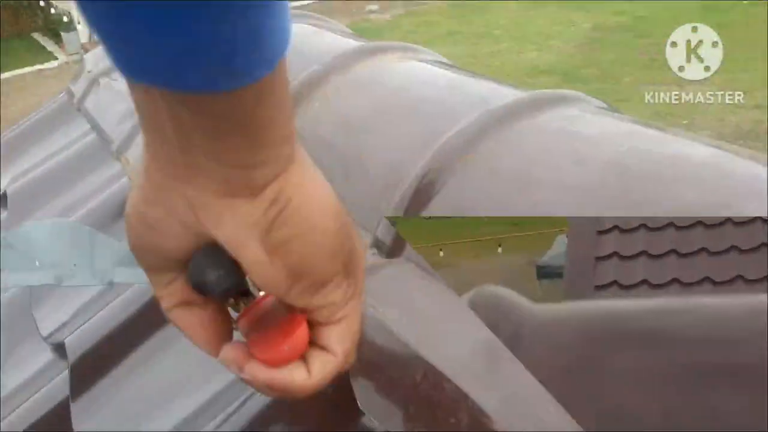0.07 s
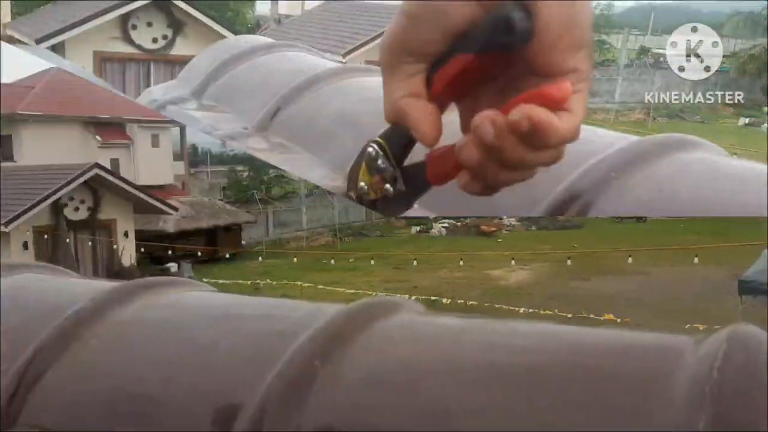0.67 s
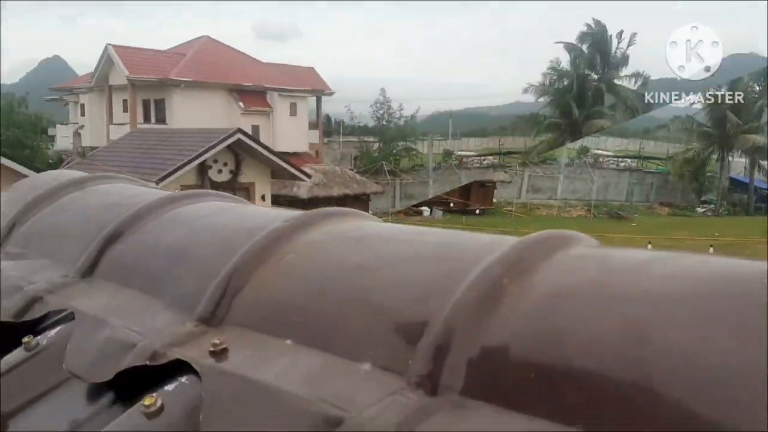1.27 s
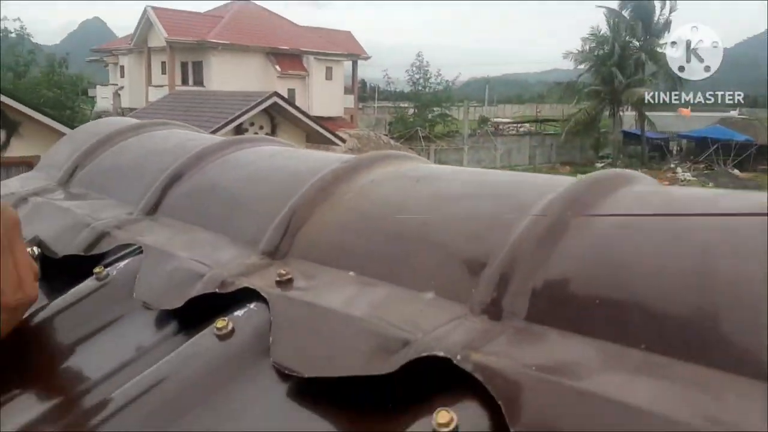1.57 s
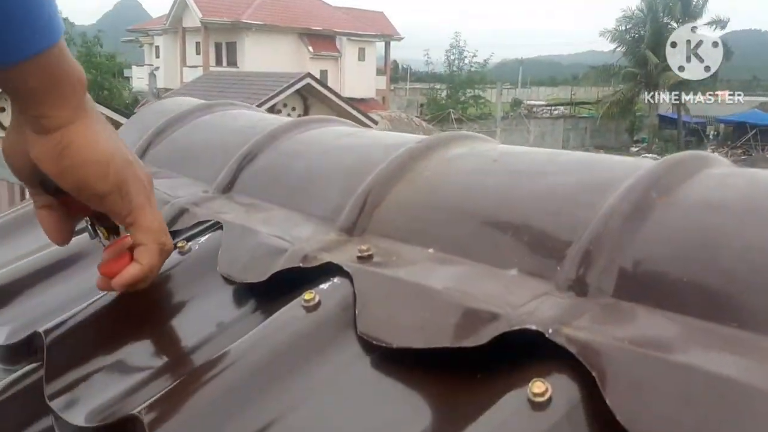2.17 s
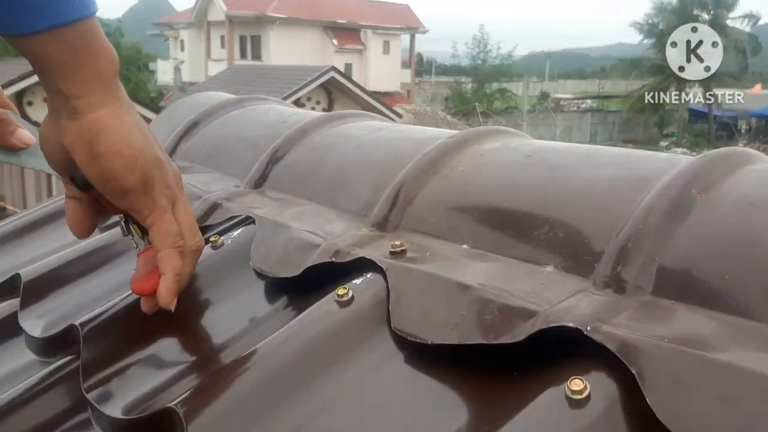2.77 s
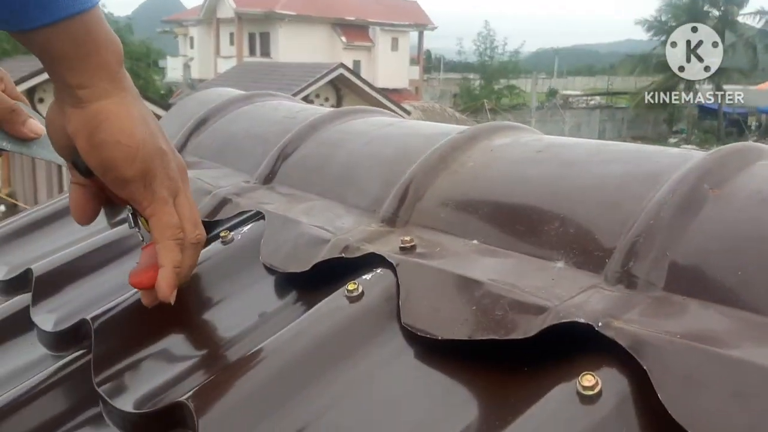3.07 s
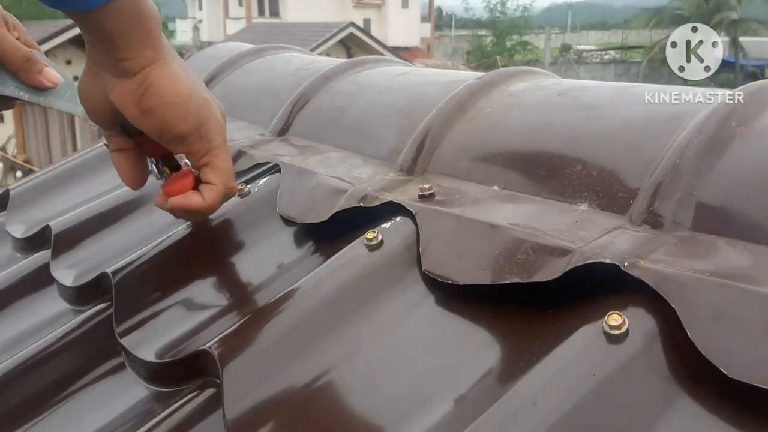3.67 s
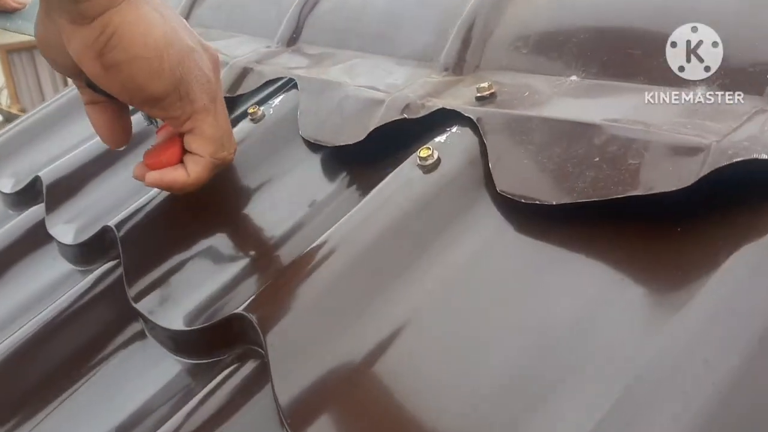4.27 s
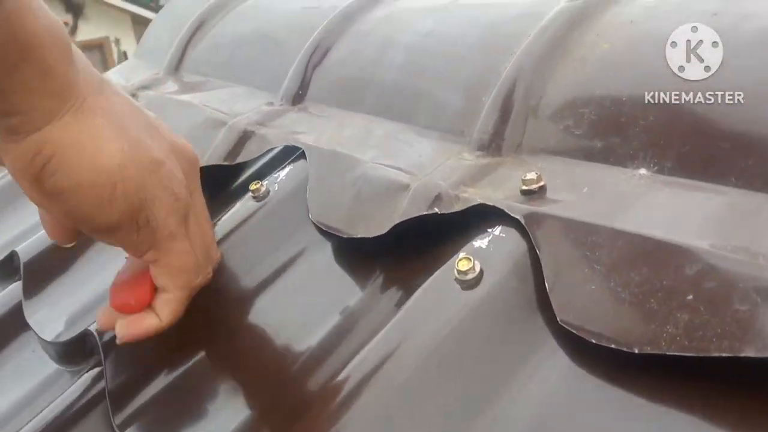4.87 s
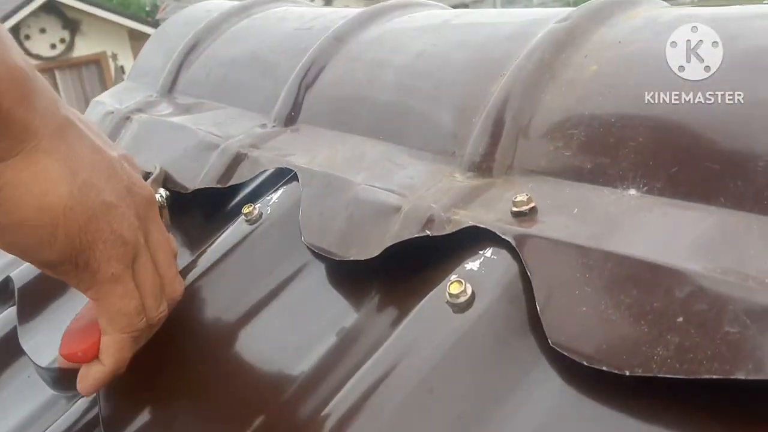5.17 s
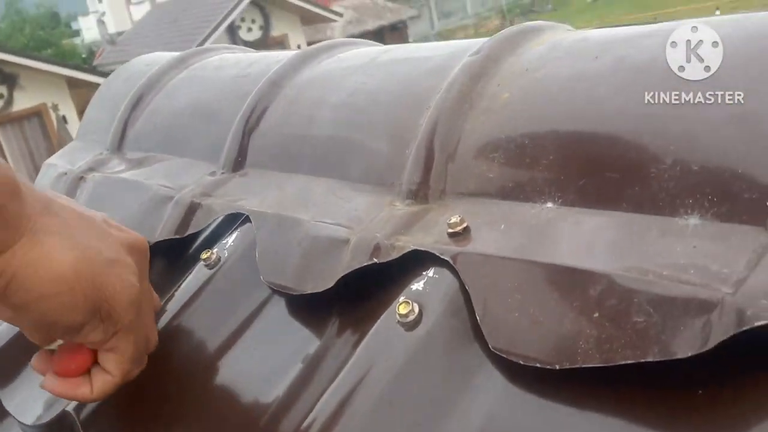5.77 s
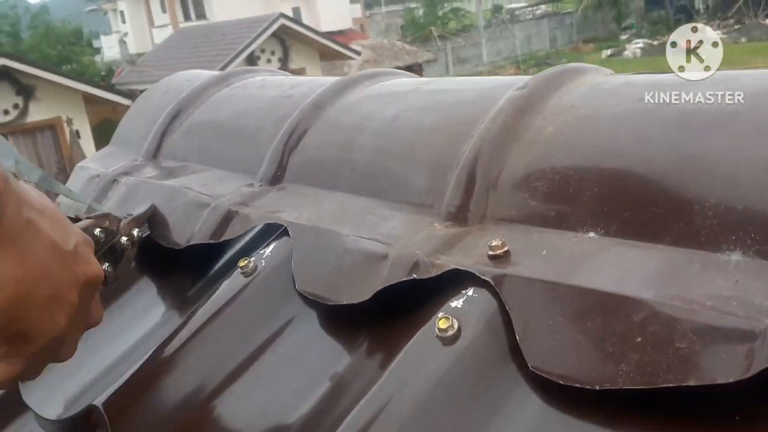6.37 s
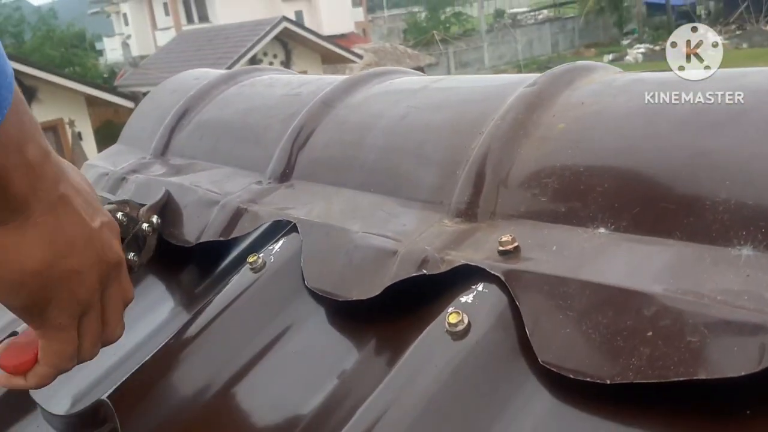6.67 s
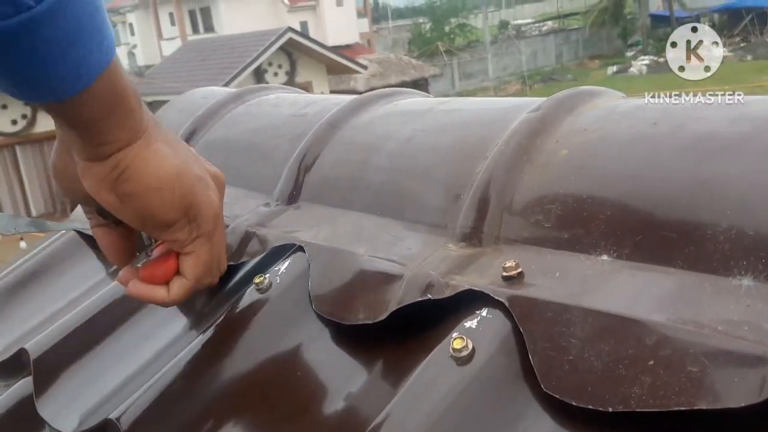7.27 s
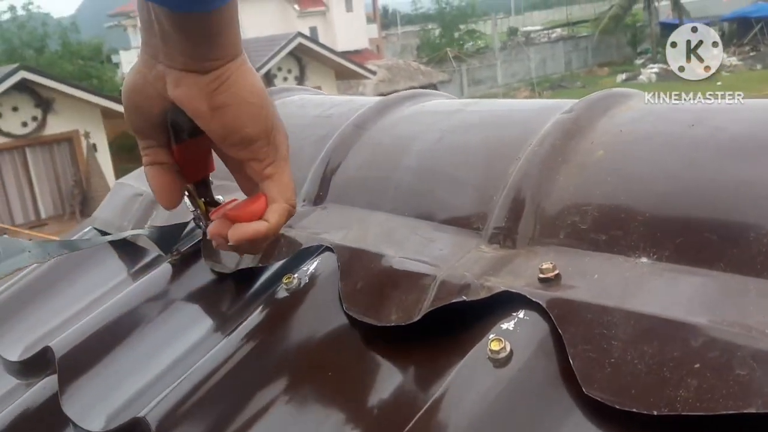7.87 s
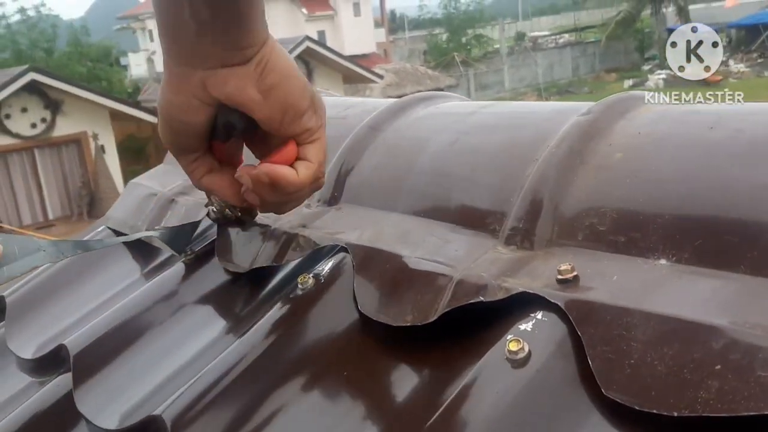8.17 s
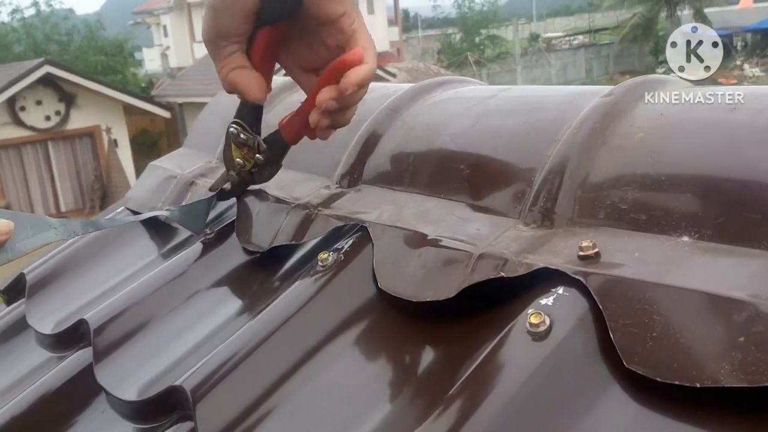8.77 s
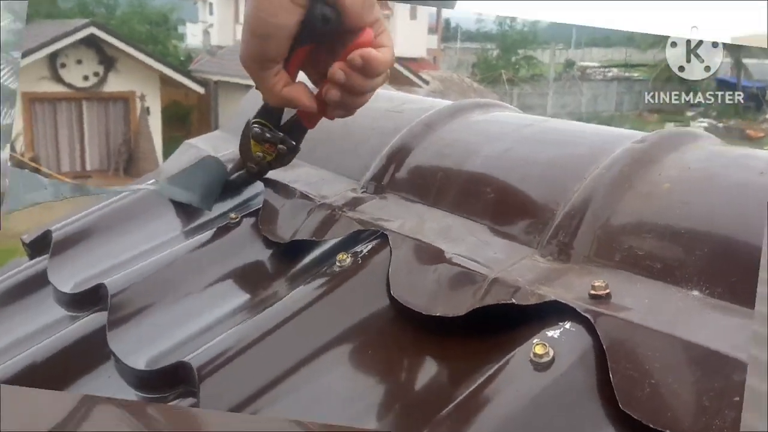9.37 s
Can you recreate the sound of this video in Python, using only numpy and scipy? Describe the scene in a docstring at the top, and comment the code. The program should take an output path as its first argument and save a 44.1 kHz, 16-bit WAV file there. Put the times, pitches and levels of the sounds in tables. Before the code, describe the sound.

Wind buffets the microphone over a faint distant wash while someone handles snips on a metal roof, with soft rattles, rustles and rubbing. After a few seconds the snips bite into the steel sheet close by, again and again at an uneven pace, each squeeze a dense crackle, several finishing with a crisp ringing snap. Tiny squeaks and one hollow pop of the sheet come among the last cuts.

```python
"""Outdoors on a roof, hand snips cut through a pressed-steel sheet about a metre from a phone.
Each squeeze shears the steel in a dense crackle, and some bites end in a snap; both ring the sheet.
The jaws squeak, the sheet buckles once, and early on something rubs, rustles and rattles lightly.
Wind buffets the two microphone ports, over a distant wash, a wavering drone and a faint high whistle."""
import sys
import numpy as np
from scipy import signal
from scipy.fft import rfft, irfft
from scipy.io import wavfile

SR = 44100
rng = np.random.default_rng(int(sys.argv[2]) if len(sys.argv) > 2 else 0)


def materialize(psi):
    """Save the field psi as 16-bit PCM at rate SR to the path in sys.argv[1].

    A 1-D psi becomes a single channel; in a 2-D psi each row is a channel.
    """
    bounded = np.clip(np.atleast_2d(psi).T, -1, 1)
    quanta = np.round(bounded * 32767).astype(np.int16)
    wavfile.write(sys.argv[1], SR, quanta)


N = 419391
TIME = np.arange(N) / SR
SIDES = np.array([[1], [-1]])  # left, right

# strength of the wind at the ports: (time [s], rumble [dB], buffeting [dB])
WIND_STRENGTH = [(0, -53.5, -42), (.64, -47.5, -46.5), (0.85, -42.5, -37), (1.2, -40.5, -43.5),
                 (1.36, -32.5, -42), (2.0, -35.5, -39), (2.2, -45, -58), (2.42, -63, -57.5),
                 (2.74, -43, -54), (3.55, -37, -44.5), (4.352, -38.5, -43), (4.8, -37.5, -40),
                 (5.05, -33.5, -38), (5.5, -39, -42.5), (5.76, -32.5, -43), (5.9, -47, -51),
                 (6.12, -36.5, -47), (6.82, -39.5, -44.5), (7.1, -34, -38.5), (7.55, -36, -43),
                 (9.51, -37.5, -42.5)]
# tone of air crackling in a port: (frequency [Hz], level [dB])
PORT_SPECTRUM = [(200, -19), (550, -14.5), (800, 7), (1200, -13.5), (2000, -15.5), (8000, -50)]
# tone of a dry crackle: (frequency [Hz], level [dB])
CRACKLE_SPECTRUM = [(1000, -4.5), (3800, -8), (7500, -11.5), (15500, -23)]


def snips(grit_db=-11, crack=0.23, edge_db=-17, snap_rise_s=0.00084):
    """Strokes swell as the hand squeezes; snaps start at once with a crack. Both drive the sheet."""
    # the blades shear or scrape the steel: (start [s], swell [s], fade [s], level [dB], body [dB])
    strokes = [(-0.028, 0.043, 0.086, -34, -3), (0.815, 0.077, 0.028, -30, 2.5), (.98, 0.016, 0.2, -41, 2),
               (3.091, 0.052, 0.18, -43, -1), (3.55, 0.063, 0.025, -29.5, -2),
               (3.832, 0.087, 0.04, -29, -1), (4.143, 0.068, 0.031, -27.5, -6.5),
               (4.424, 0.031, 0.024, -23, 0), (4.625, 0.05, 0.0026, -23.5, 3.5),
               (4.753, 0.057, 0.02, -29.5, 2.5), (4.923, 0.04, 0.021, -22.5, 3.5),
               (5.64, 0.08, 0.034, -29, -2), (5.845, 0.084, 0.015, -29, 0.5),
               (6.006, 0.067, 0.037, -30, -2), (6.227, 0.066, 0.028, -26, 3),
               (6.393, 0.033, 0.038, -21, -8), (6.572, 0.075, 0.011, -28, 1),
               (6.755, 0.089, 0.013, -26, -5.5), (6.956, 0.053, 0.03, -23.5, 0),
               (7.327, 0.052, 0.051, -34, 1), (8.171, 0.048, 0.034, -31.5, -1.5),
               (8.352, 0.13, 0.079, -33, -10), (8.59, 0.069, 0.1, -29.5, 4.5),
               (8.81, 0.046, 0.027, -25, 3.5), (8.974, 0.033, 0.042, -26, -2.5),
               (9.135, 0.11, 0.024, -26, 4), (9.304, 0.04, 0.072, -27.5, -3.5)]
    # the blades break through: (time [s], fade [s], level [dB], body [dB], treble [dB], edge note [Hz])
    snaps = [(3.594, 0.015, -9, -6.5, 3, 3330), (3.903, 0.0059, -11.5, 3, -1.5, 2310),
             (4.218, 0.015, -12, -7, 8.5, 2330), (4.498, 0.015, -20.5, -8.5, 4, 2400),
             (4.647, 0.026, -17.5, -19, 2.5, 2125), (5.446, 0.021, -31, 3, -10, 2316),
             (6.469, 0.0069, -15, -4.5, -11, 4030), (6.903, 0.0077, -8.5, -17.5, 6, 2180),
             (7.147, 0.025, -20.5, -4, 3, 2240), (7.188, 0.014, -5.5, -13.5, 2.5, 4050),
             (7.222, 0.0052, -6.5, -7.5, 7.5, 4060), (8.47, 0.0047, -18.5, 3, -0.5, 4610),
             (9.09, 0.014, -23.5, -1, -2.5, 3470), (9.332, 0.022, -21, -5.5, 2, 3420)]
    out = np.zeros((2, N))
    for start, swell, fade, db, body_db in strokes:
        t = seconds(min(swell + 5 * fade, 2))
        squeeze = swell_fade(t, swell, fade)
        force = tearing(t, slips_per_s=800, spread_db=3.75) * surges(t) * squeeze
        response = sheet(body_db, treble_db=-3)  # slow shearing sounds dull
        add(out, start, undb(db) * signal.fftconvolve(force[None], response))
        add(out, start, undb(db + grit_db) * grit(t) * squeeze)
    for start, fade, db, body_db, treble_db, note_hz in snaps:
        t = seconds(5 * fade)
        force = tearing(t, slips_per_s=4000, spread_db=1) * swell_fade(t, snap_rise_s, fade)
        force[0] += crack * np.linalg.norm(force)
        response = sheet(body_db, treble_db, extra_peaks=[(note_hz, 160, 4)])
        response += undb(edge_db) * cut_edge(note_hz, TIME[:response.shape[1]])
        add(out, start, undb(db) * signal.fftconvolve(force[None], response))
    return out


def tearing(t, slips_per_s, spread_db):
    """Steel gives way in tiny slips of unequal size: random impulses, at least one; rms 1."""
    chance, size, sign = rng.random((3, 3 * SR))[:, :len(t)]
    slips = chance <= max(slips_per_s / SR, chance.min())
    strength = undb(-spread_db * np.log(np.maximum(size, 0.03)))
    return unit(slips * strength * np.sign(sign - 0.5))


def surges(t, spread_db=5.5, every_s=0.00674):
    """The blades catch and let go, so a stroke advances unevenly; the hand's force has a ceiling."""
    pushes = np.minimum(rng.standard_normal(512), 0.5)
    return unit(undb(spread_db * np.interp(t / every_s, np.arange(512), pushes)))


def grit(t, grain_s=0.0008):
    """The coarser slips reach the ear straight from the jaws as dry crackles; rms 1."""
    grain = noise(CRACKLE_SPECTRUM, len(t), likeness=0.38) * np.exp(-t / grain_s)
    slips = tearing(t, slips_per_s=160, spread_db=2.2)
    return unit(irfft(rfft(grain) * rfft(slips), len(t)))


def sheet(body_db, treble_db, extra_peaks=(), crack_db=-1, tail_db=0.5, rings_db=-12, lag_s=0.00045):
    """The sheet's answer to a knock: a crack near the jaws, a wash of crowded modes, a few lone rings."""
    # overall tone of the crowded modes: (frequency [Hz], level [dB])
    spectrum = [(100, -26), (300, 3), (560, -6), (760, 6.5), (1300, 3.5), (1800, -7.5), (2400, -4),
                (3800, -5), (4900, -10), (7800, -13), (8700, -26), (10500, -16), (15500, -22)]
    # where they bunch up: (centre [Hz], width [Hz], boost [dB])
    clusters = [(840, 90, 2.3), (1134, 26, 4.3), (1212, 35, 5.6), (1550, 137, 8.7), (2070, 105, 12.7),
                (2580, 38, 2), (2580, 30, 1.9), (2700, 53, 6), (3370, 280, 2.5), (3896, 38, 3.7),
                (4065, 80, 5.4), (7860, 670, 5.6)]
    # how long they last: (frequency [Hz], t60 [s])
    decays = [(500, 0.31), (1200, 0.24), (3000, 0.26), (8000, 0.23), (14000, 0.22)]
    # lone modes that ring on: (frequency [Hz], level [dB], t60 [s])
    lone_modes = [(1106, 5.5, 0.078), (1188, -2.5, 0.43), (2170, 2, 0.27), (2330, -1, 0.47),
                  (2560, -9.5, 0.61), (3370, -11.5, 0.5), (3740, -5.5, .39), (4760, -20, 0.26),
                  (7250, -16, .3)]
    size = 24000
    t, hz = np.arange(size) / SR, bins(size)
    flat = [(1, 0), (SR, 0)]
    fading = lambda t60: unit(np.exp(-np.log(1000) * t / t60)) / np.sqrt(size)
    wash = rfft(noise(flat, size))
    centres, t60s = np.transpose(decays)
    bands = [along(np.c_[centres, band], hz) for band in np.eye(len(centres))]
    tail = sum(irfft(wash * band) * fading(t60) for band, t60 in zip(bands, t60s))
    crack = noise(flat, size, likeness=0.36) * fading(t60=0.049)
    crowded = undb(crack_db) * crack + undb(tail_db) * tail
    peaks_db = sum(db / (1 + (2 * (hz - f) / width) ** 2) for f, width, db in [*clusters, *extra_peaks])
    colour = unit(undb(along(spectrum, hz) + peaks_db))
    steel = rfft(crowded) * colour + undb(rings_db) * rfft(ring(lone_modes, t))
    # a slow bite bends the whole sheet, which lies to the right; a quick one excites the treble
    body_cut_db = min(body_db, 0)
    bite = undb(along([(800, body_cut_db), (1210, body_db), (1500, body_cut_db), (2000, 0), (3400, 0),
                       (5500, treble_db), (8000, treble_db), (11000, treble_db / 2)], hz))
    pan = undb(SIDES / 2 * along([(1300, -2), (2500, -0.5), (9000, -0.24)], hz))
    left_delay = np.exp(-2j * np.pi * hz * lag_s * (SIDES > 0))
    return irfft(steel * bite * pan * left_delay)[:, :20000]


def cut_edge(note_hz, t, count=12, scatter=0.07, t60_s=0.5):
    """The freshly cut edge sings on in close modes that beat against each other."""
    pitch, size = rng.standard_normal((2, count))
    return ring(np.c_[note_hz * np.exp(scatter * pitch), 2 * size, np.full(count, t60_s)], t)


def ring(modes, t, detune=0.00228):
    """Damped modes; random sizes and phases stand for where the steel is struck and heard."""
    hz, db, t60 = np.transpose(modes)[:, :, None]
    hz = hz * (1 + detune * rng.standard_normal(hz.shape))
    waves = np.exp((2j * np.pi * hz - np.log(1000) / t60) * t)
    weights = rng.standard_normal((2, len(hz))) + 1j * rng.standard_normal((2, len(hz)))
    return unit(((weights * undb(db.T)) @ waves).imag) / np.sqrt(len(t))


def buckle(pan_db=-2, lag_s=0.000072, wash_db=11, clack_db=7):
    """A panel pops through with a hollow clack, which spreads into the rest of the sheet."""
    # the quick pops of one buckle: (time [s], relative level [dB])
    pops = [(8.6743, -13.5), (8.6795, -17), (8.686, -23)]
    # the panel's short modes: (frequency [Hz], level [dB], t60 [s])
    modes = [(750, 2, 0.097), (1100, 6, 0.22), (1152, 21, 0.077), (1566, 12, 0.066), (2250, 0, 0.087)]
    out, t = np.zeros((2, N)), seconds(0.25)
    clack = sum(undb(db) * np.sin(2 * np.pi * hz * t) * np.exp(-np.log(1000) * t / t60)
                for hz, db, t60 in modes)
    clack /= np.max(np.abs(clack))
    pair = np.array([clack, np.interp(t - lag_s, t, clack)]) * undb(SIDES * pan_db / 2)
    for start, db in pops:
        add(out, start, undb(db + clack_db) * pair)
        add(out, start, undb(db + wash_db) * sheet(body_db=13, treble_db=-18))
    return out


def squeaks(rise_s=0.00155):
    """The jaws catch for a few milliseconds on a narrow resonance."""
    # each catch: (time [s], pitch [Hz], level [dB])
    catches = [(0.735, 3850, -31), (8.402, 3980, -35.5), (8.437, 3600, -34), (8.500, 4560, -31),
               (8.56, 4150, -30), (8.59, 4000, -35)]
    out, t = np.zeros((2, N)), seconds(0.05)
    envelope = t / rise_s * np.exp(1 - t / rise_s)
    for s, hz, db in catches:
        tone = noise([(hz * 0.93, -40), (hz, 0), (hz * 1.3, -40)], len(t), likeness=0.12)
        add(out, s - rise_s / 2, undb(db) * tone * envelope)
    return out


def rattle(run_db=-3, rise_s=0.0045, fade_s=0.014, click_fade_s=0.0026):
    """Runs of short bright chatters, and a few sharper single clicks."""
    # evenly paced light rattling: (start [s], length [s], gap [s], first level [dB], last level [dB])
    runs = [(0.056, .46, .0612, -30, -33), (0.398, .05, .0205, -31, -30), (0.573, .19, .0545, -34, -29),
            (0.952, .33, .0615, -37, -39)]
    # dry clicks of the tool: (time [s], level [dB])
    clicks = [(0.018, -24.5), (0.068, -25), (0.371, -28), (0.416, -25.5), (0.689, -42), (0.733, -29),
              (1.137, -31)]
    out, t = np.zeros((2, N)), seconds(0.1)
    for start, length, gap, first_db, last_db in runs:
        times = start + np.arange(0, length, gap)
        for s, db in zip(times, np.linspace(first_db, last_db, len(times))):
            add(out, s - rise_s / 2, undb(db + run_db) * chatter(t) * swell_fade(t, rise_s, fade_s))
    for s, db in clicks:
        add(out, s, undb(db) * chatter(t) * np.exp(-t / click_fade_s))
    return out


def chatter(t, tick_s=0.00019, hiss_db=-6):
    """A cluster of tiny dry ticks in a bright hiss; rms 1."""
    # tone of ticks and hiss: (frequency [Hz], level [dB])
    spectrum = [(1800, -26), (2750, -10), (3500, 8), (4400, 8), (5400, -3.5), (8500, -3), (15500, -5.5)]
    tick = noise(spectrum, len(t), likeness=0.22) * np.exp(-t / tick_s)
    ticks = irfft(rfft(tick) * rfft(tearing(t, slips_per_s=1800, spread_db=2.1)))
    return unit(unit(ticks) + undb(hiss_db) * noise(spectrum, len(t)))


def rub(grain_db=4.5, grain_hz=60):
    """Something slides over the paint with a dull, uneven rub that does not ring the sheet."""
    # each slide: (start [s], swell [s], fade [s], level [dB])
    slides = [(-0.05, .05, 0.12, -42), (.88, 0.31, 0.53, -42.5), (1.17, 0.055, 0.26, -33),
              (3.05, 0.21, 0.22, -32.5), (3.5, 0.27, 0.19, -35.5)]
    # tone of the friction: (frequency [Hz], level [dB])
    spectrum = [(200, -4.5), (550, -0.5), (900, 6.5), (1500, -4), (2200, -13.5), (4500, -21), (8500, -27.5),
                (15000, -25.5)]
    power = sum((undb(db) * swell_fade(np.maximum(TIME - start, 0), swell, fade)) ** 2
                for start, swell, fade, db in slides)
    friction = noise(spectrum, N, likeness=0.29) * undb(grain_db * flutter(grain_hz))
    return unit(friction) * np.sqrt(power)


def rustle(grain_s=0.003):
    """A bright, dry rustle of many small crackles."""
    # each flurry: (start [s], swell [s], fade [s], level [dB])
    flurries = [(0, 0.009, 0.024, -30.5), (1.0, 0.046, .06, -41), (1.22, 0.212, .035, -41)]
    out, t = np.zeros((2, N)), seconds(0.5)
    colour = undb(along(CRACKLE_SPECTRUM, bins(len(t))))
    for start, swell, fade, db in flurries:
        grain = rng.standard_normal((2, len(t))) * np.exp(-t / grain_s)
        crackle = irfft(rfft(grain) * rfft(tearing(t, slips_per_s=900, spread_db=1)) * colour)
        add(out, start, undb(db) * unit(crackle) * swell_fade(t, swell, fade))
    return out


def wind(rumble_db=1, buffet_db=-0.5, crackle_db=-10, rumble_pan_db=6):
    """Turbulence, different at each port: a rumble, fitful buffeting and a dull crackle at its peaks."""
    # tone of the rumble: (frequency [Hz], level [dB])
    rumble_spectrum = [(20, -26), (60, -2.5), (100, -1), (180, -3.5), (260, -9), (500, -53), (1500, -48)]
    # tone of the buffeting: (frequency [Hz], level [dB])
    buffet_spectrum = [(100, -18), (220, -2), (330, 4), (500, -2), (800, -7.5), (1300, -22), (2500, -35),
                       (8000, -62)]
    times, *levels = np.transpose(WIND_STRENGTH)
    low_db, high_db = (np.interp(TIME, times, level) for level in levels)
    fits = flutter(27.4)  # all three layers surge with this
    rumble = noise(rumble_spectrum, N, likeness=0.08)
    rumble *= undb(5.5 * np.minimum(unit(flutter(13.3) + fits / 2), 1.4))
    buffet = noise(buffet_spectrum, N) * undb(8.5 * np.minimum(fits, 1))
    crackle = noise(PORT_SPECTRUM, N) * undb(24 * np.minimum(unit(fits + flutter(87)), 2))
    return (unit(rumble) * undb(low_db + rumble_db + SIDES * rumble_pan_db / 2)
            + unit(buffet) * undb(high_db + buffet_db)
            + unit(crackle) * undb(high_db + crackle_db))


def gusts():
    """Each strong gust hits the ports with a single thump."""
    # (peak time [s], swell [s], level [dB], centre [Hz], left minus right [dB])
    thumps = [(0.018, 0.0035, -27, 500, -11), (0.774, 0.0098, -24, 150, -4), (1.321, 0.005, -19.5, 266, -2),
              (1.407, 0.0066, -20.5, 332, -1.5), (1.521, 0.0036, -27, 497, -8),
              (1.545, 0.0047, -26.5, 383, 2), (1.577, 0.0028, -26, 330, -12),
              (1.621, 0.0026, -27.5, 660, -12), (1.665, 0.0046, -28, 680, -10),
              (1.758, 0.0047, -24.5, 380, -10), (1.781, 0.0085, -26, 282, -1),
              (1.828, 0.0047, -31.5, 596, -10), (1.909, 0.0053, -29.5, 514, 0),
              (1.932, 0.0057, -28.5, 283, -2), (2.064, 0.0075, -26, 213, -4),
              (3.045, 0.0089, -27.5, 194, -4), (4.011, 0.019, -28.5, 219, -3),
              (5.089, 0.0049, -26, 210, -1), (5.109, 0.0046, -22, 230, 1), (5.156, 0.0052, -24, 230, -3),
              (5.188, .003, -32, 300, 0), (5.334, 0.0035, -25.5, 330, -9), (5.666, 0.0054, -21, 240, -3),
              (5.712, 0.011, -25.5, 302, -3), (5.781, 0.0086, -26, 190, 0),
              (6.484, 0.013, -19.5, 232, -1.5), (7.016, .016, -21, 240, -2.5), (7.065, 0.0092, -24, 201, 1),
              (7.436, 0.0087, -28.5, 372, -18), (7.648, 0.0074, -27, 480, -2),
              (7.733, 0.00152, -21, 240, 2), (7.757, 0.0034, -24.5, 388, 0),
              (7.944, 0.0076, -29.5, 273, -2), (8.116, 0.014, -26, 268, 2), (8.282, 0.0046, -26, 148, -5)]
    out = np.zeros((2, N))
    for peak, swell_s, db, hz, pan_db in thumps:
        add(out, peak - swell_s, undb(db) * puff(swell_s, hz, pan_db))
    return out


def eddies(count=130, gain_db=5.5, centre_hz=480, spread_octaves=0.4, swell_cycles=0.82):
    """Small eddies knock at random, harder as the wind buffets more; the higher ones are shorter."""
    out = np.zeros((2, N))
    times, _, buffeting_db = np.transpose(WIND_STRENGTH)
    starts = rng.random(count) * N / SR
    for start, (softer_db, pitch, side) in zip(starts, rng.standard_normal((count, 3))):
        hz = centre_hz * 2 ** (spread_octaves * pitch)
        db = np.interp(start, times, buffeting_db) + gain_db - softer_db
        add(out, start, undb(db) * puff(swell_cycles / hz, hz, pan_db=-3 + 7 * side))
    return out


def puff(swell_s, hz, pan_db, crack_s=0.0028):
    """A dull puff of air that breaks at its height with a crack in the port; higher puffs crack harder."""
    t = seconds(0.1)
    swell = t / swell_s * np.exp(1 - t / swell_s)
    spectrum = [(hz / 10, -26), (hz / 2, -5), (hz, 0), (hz * 2, -12), (hz * 4, -25), (hz * 16, -54)]
    air = swell * noise(spectrum, len(t))
    air *= np.linalg.norm(swell) / np.linalg.norm(air, axis=1, keepdims=True)
    crack = np.exp(-np.abs(t - swell_s) / crack_s) * noise(PORT_SPECTRUM, len(t), likeness=0.2)
    crack_db = -3 + 5 * np.log2(hz / 400)
    return (air + undb(crack_db) * crack) * unit(undb(SIDES * pan_db / 2))


def outdoors(wash_db=-48.5, waver_db=0.86, drone_hz=1570, drone_flutter_db=6):
    """A faint, nearly even wash from far away, and a narrow, noisy drone that comes and goes in it."""
    # tone of the far surroundings: (frequency [Hz], level [dB])
    spectrum = [(150, -6), (300, -24), (600, -7.5), (900, -0.5), (1280, -7), (1720, -3), (2300, -7.5),
                (5000, -11), (8000, -15), (9000, -18), (15500, -16)]
    # rise and fall of the drone: (time [s], level [dB])
    drone_levels = [(0, -76), (.8, -64), (1.2, -53), (2.3, -57.5), (3.2, -55), (5, -60.5), (9.51, -57)]
    drone = noise([(drone_hz * 0.51, -35), (drone_hz, 0), (drone_hz * 1.23, -28), (drone_hz * 2, -55)], N)
    drone *= undb(np.interp(TIME, *np.transpose(drone_levels)) + drone_flutter_db * flutter(36))
    wash = noise(spectrum, N, likeness=0.031) * undb(wash_db + waver_db * flutter(19))
    return wash + drone


def whistle(waver=0.006, flutter_db=5):
    """A very high, unsteady thread of tone glides down, up and down."""
    # its path: (time [s], pitch [Hz], relative level [dB])
    glide = [(1.201, 14700, -69), (1.7, 12200, -53), (2.1, 11000, -66), (3.2, 7150, -81), (3.8, 13400, -63),
             (4.4, 11300, -53)]
    times, hz, db = np.transpose(glide)
    pitch = np.interp(TIME, times, hz) * (1 + waver * flutter(39.2))
    phase = 2 * np.pi * np.cumsum(pitch, axis=1) / SR
    level_db = np.interp(TIME, times, db, left=-np.inf, right=-np.inf)
    return np.sin(phase) * undb(level_db + flutter_db * (flutter(18) - 0.5))


def noise(points, size, likeness=0):
    """Stereo noise shaped by (frequency [Hz], level [dB]); likeness is the power share in common."""
    white = rng.standard_normal((3, size))
    pair = np.sqrt(likeness) * white[2] + np.sqrt(1 - likeness) * white[:2]
    return unit(irfft(rfft(pair) * undb(along(points, bins(size))), size))


def flutter(rate_hz):
    """Smooth random motion, separate for each channel; rms 1."""
    return unit(irfft(rfft(rng.standard_normal((2, N))) / (1 + (bins(N) / rate_hz) ** 4), N))


def swell_fade(t, swell, fade):
    """Pressure builds evenly, then dies away."""
    return np.minimum(t / swell, np.exp(-np.maximum(t - swell, 0) / fade))


def add(out, s, x):
    """Mix a sound in at time s."""
    start = int(s * SR)
    first, last = max(start, 0), min(start + x.shape[-1], N)
    out[:, first:last] += x[..., first - start:last - start]


def along(points, hz):
    """Read (frequency [Hz], value) points on a log-frequency axis."""
    f, value = np.transpose(points)
    return np.interp(np.log(hz), np.log(f), value)


def bins(size):
    """Frequencies of a spectrum, floored at 1 Hz."""
    return np.maximum(np.fft.rfftfreq(size, 1 / SR), 1)


def seconds(length):
    """Time axis of a short sound."""
    return np.arange(int(length * SR)) / SR


def undb(db):
    """Decibels to gain."""
    return 10 ** (np.asarray(db) / 20)


def unit(x):
    """Scale to rms 1."""
    return x / np.sqrt(np.mean(x ** 2))


def scene():
    """Work on the roof up front, wind on the ports, the distance behind."""
    work = snips() + buckle() + squeaks() + rattle() + rub() + rustle()
    return work + wind() + gusts() + eddies() + outdoors() + whistle()


def record(dry):
    """The phone rounds the highest peaks and cuts the top."""
    rounded = np.tanh(0.83 * dry) / 0.76
    lowpass = signal.ellip(10, 0.2, 80, 15550, fs=SR, output="sos")
    return signal.sosfilt(lowpass, rounded)


dry = scene()
out = record(dry)
materialize(out)
```